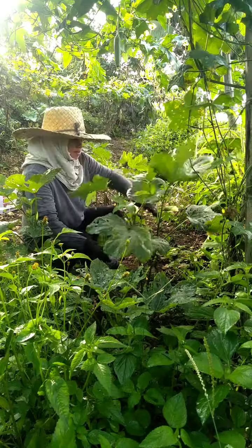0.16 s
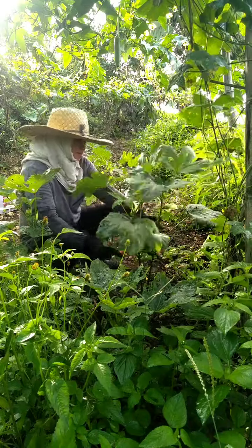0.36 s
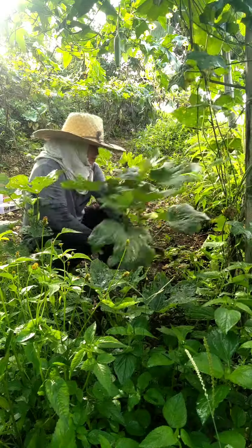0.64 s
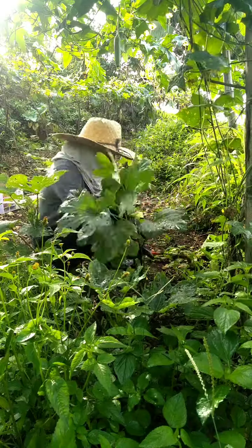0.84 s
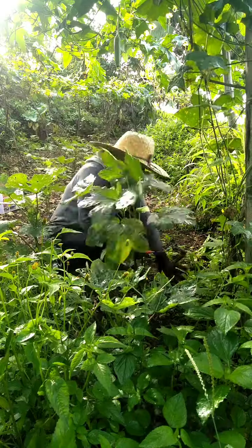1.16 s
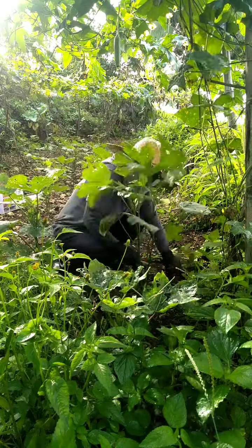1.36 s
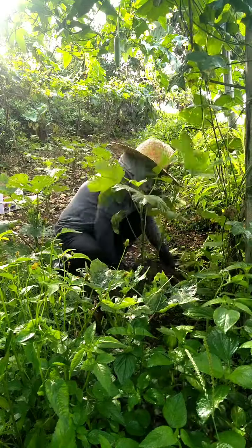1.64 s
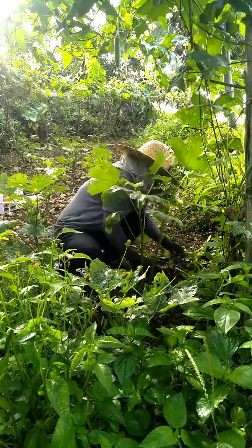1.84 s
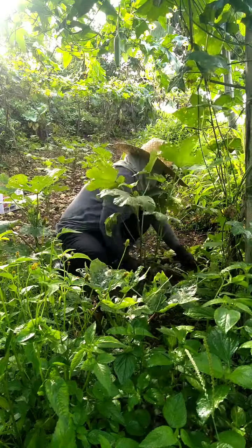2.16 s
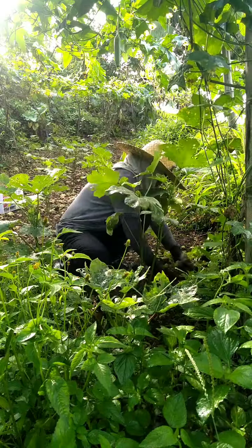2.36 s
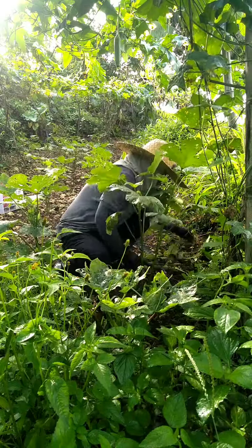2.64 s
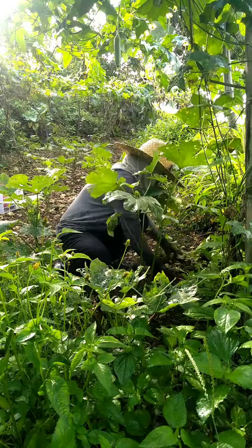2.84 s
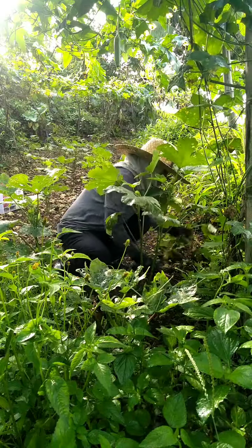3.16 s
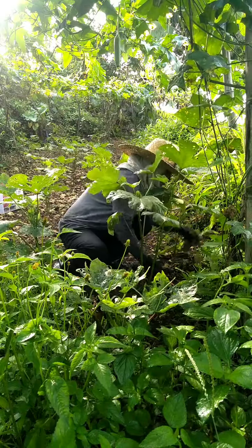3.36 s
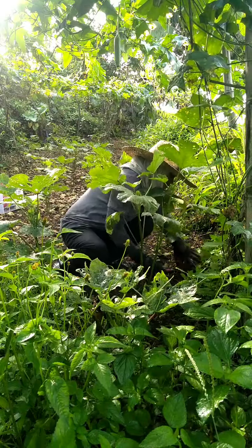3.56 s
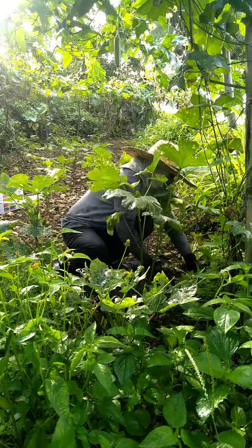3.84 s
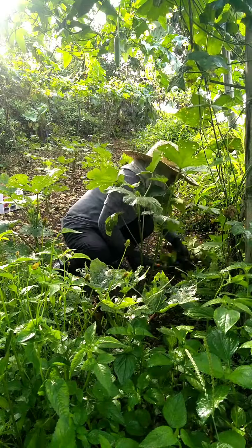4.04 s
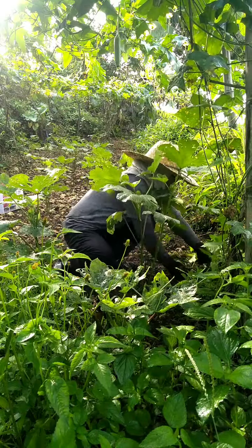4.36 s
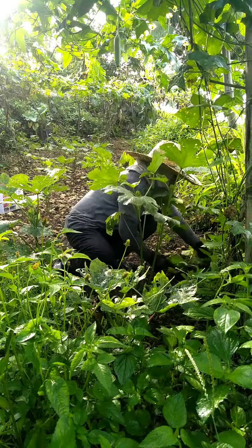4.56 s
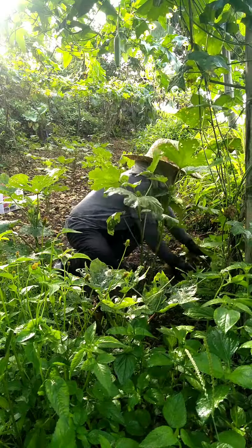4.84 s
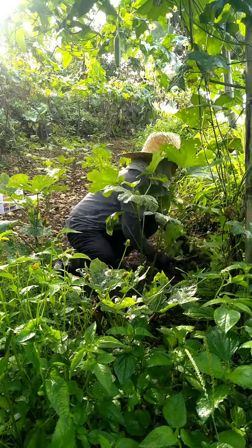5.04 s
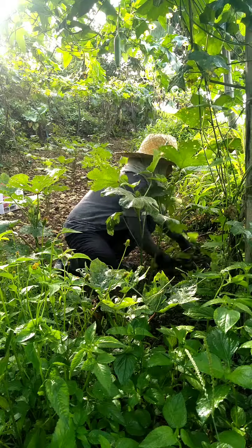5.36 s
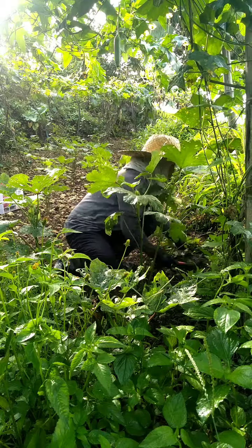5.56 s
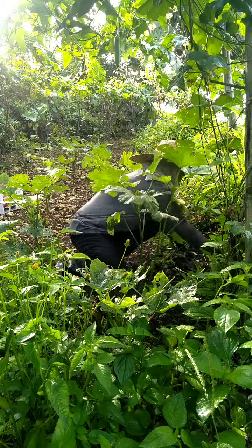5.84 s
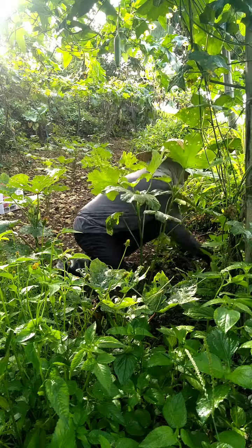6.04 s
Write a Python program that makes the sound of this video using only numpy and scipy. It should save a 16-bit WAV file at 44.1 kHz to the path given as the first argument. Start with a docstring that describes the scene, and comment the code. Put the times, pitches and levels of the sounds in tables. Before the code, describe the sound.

Hand weeding outdoors: leaf rustle, sharp stem cracks and blade scrapes in bursts, over steady high cricket trills and one close bird chip.

```python
"""Weeding by hand in a leafy garden: crickets sing and leaves rustle from the start, as calls come from the bushes.
Then stems snap and a small blade knocks and scrapes in gritty soil; amid this a close bird chips once.
The blade rests, returns in a short burst, the chirping crickets having softened just before, and strikes last near the end.
Shaped noise makes leaves, soil, cracks and bush calls; sine tones make the crickets, the chip and the ringing blade.
Decaying noise tails scatter every sound but the soil and the air."""
import sys
import numpy as np
from scipy import signal
from scipy.fft import rfft, irfft, next_fast_len
from scipy.io import wavfile
from scipy.ndimage import uniform_filter1d, map_coordinates

SR = 44100
rng = np.random.default_rng(int(sys.argv[2]) if len(sys.argv) > 2 else 0)


def file_out(sig):
    """Save sig as 16-bit WAV at sys.argv[1]."""
    # one column per channel
    cols = np.atleast_2d(sig).T
    # limit, then scale
    lim = np.clip(cols, -1, 1)
    pcm = np.round(lim * 32767).astype(np.int16)
    wavfile.write(sys.argv[1], SR, pcm)


N = 273420
TIME = np.arange(N) / SR  # seconds
TOP_HZ = 15720  # upper band limit

# Table levels are relative: each layer's function adds its own gain.
# spectrum of still outdoor air: pitch_hz [Hz], level_db [dB]
AIR_SPECTRUM = [(20, 1), (90, -9), (200, -12.5), (500, -16.5), (1500, -23.5), (3500, -22), (5000, -21.5),
                (8000, -21), (13000, -21.5), (15700, -24.5)]
# decay of the scattered echo in the foliage, scaled by each echo's life: pitch_hz [Hz], t60_s [s]
FOLIAGE_DECAY = [(200, 0.55), (1500, 0.24), (6000, 0.52), (14000, 0.14)]

# passages where the high cricket falters: start_s [s], end_s [s], level_db [dB]
TRILL_FALTERS = [(1.11, 1.2, -4), (1.58, 2.206, -3.5), (3.44, 4.19, -6.5)]
FALTER_SKIP_DB = -9.5  # further drop on every other pair of wing strokes
NEAR_CHIRP_S, EARLY_CHIRP_S, SLOWS_AT_S = .2146, .205, 1.4  # near period, its quicker opening period, when it slows
FAR_CHIRP_S, FAR_FIRST_S = .2035, .145  # far chirper's period and first chirp
CHIRP_HALF_S, CHIRP_SCATTER_DB = 0.034, 2.5  # half length to 1/e; spread of level
LULL_S, LULL_HALF_S, LULL_DB = 4.3, 0.22, -20  # both chirpers soften for a moment
CHIRP_RISE_HZ_PER_S = 450  # the pitch creeps up through each chirp

# bird calls from the bushes:
# centre_s [s], level_db [dB], pitch_hz [Hz], half_length_s [s, to 1/e], half_bandwidth_hz [Hz]
BUSH_CALLS_HEARD = [(.2, -55.5, 5600, 0.11, 253), (0.409, -74, 790, 0.03, 39.7),
                    (.881, -77, 1173, 0.017, 40.7), (0.957, -49, 5920, 0.029, 252),
                    (0.935, -71.5, 3470, 0.022, 402), (1.119, -75.5, 2650, 0.013, 200),
                    (1.358, -60, 1304, 0.014, 90), (1.506, -59, 1305, 0.017, 108),
                    (1.528, -70.5, 2520, 0.027, 700), (1.524, -55.5, 5760, 0.062, 174),
                    (1.638, -48, 5660, 0.03, 570), (1.752, -42, 5600, 0.015, 525),
                    (1.978, -67.5, 890, 0.0084, 92), (2.031, -66.5, 3200, 0.026, 160),
                    (2.815, -58.5, 1195, .022, 117), (3.338, -50, 6090, .073, 146),
                    (3.952, -66, 1630, 0.023, 156), (4.012, -71.5, 2110, 0.072, 143),
                    (4.089, -43, 5380, 0.015, 730), (4.663, -75, 2274, 0.36, 58),
                    (4.733, -73, 2840, .022, 100), (5.285, -73.5, 2610, 0.055, 89),
                    (5.471, -55, 5443, 0.052, 89.5), (5.964, -74, 3340, 0.061, 120)]
# pitch and level path of the close bird's chip: time_s [s], pitch_hz [Hz], level_db [dB]
CHIP_PATH = [(2.255, 2800, -51.5), (2.261, 4290, -37.5), (2.2645, 5860, -28.5), (2.268, 6870, -24.5),
             (2.2697, 6480, -30.5), (2.273, 5730, -17), (2.276, 5740, -23.5), (2.279, 4570, -42),
             (2.283, 2550, -46.5)]

# tugs at the roots and shifts of body weight: peak_s [s], level_db [dB], build_up_s [s]
ROOT_TUGS = [(1.97, -66, .025), (2.82, -46.5, 0.095), (3.73, -56.5, 0.013), (3.82, -65.5, 0.034),
             (4.013, -60, 0.03), (4.77, -61.5, 0.065), (5.53, -63, 0.017), (6.1, -69, 0.054)]
RELAX_SHARE, RUMBLE_DB = 1.2, -77  # the soil's release over its build-up; steady outdoor rumble before the heave gain
# clods and hands landing on the ground: start_s [s], level_db [dB], centre_hz [Hz]
GROUND_THUDS = [(0.239, -58, 1110), (0.562, -57, 314), (0.607, -66, 315), (0.949, -62.5, 343),
                (0.968, -57.5, 1180), (1.793, -61.5, 370), (1.794, -63, 830), (2.111, -60.5, 241),
                (2.171, -69, 324), (2.686, -57, 313), (4.913, -50, 368), (4.98, -68, 330),
                (5.788, -51.5, 250), (5.789, -54, 820), (6.067, -53, 417), (6.105, -61, 235),
                (6.154, -55.5, 402)]
# spectrum of the rumbling ground: pitch_hz [Hz], level_db [dB]
SOIL_SPECTRUM = [(15, -17), (29, 0), (42, -5.5), (62, 0), (85, 7.5), (103, 1), (130, 0), (170, -15),
                 (400, -34.5), (900, -53)]
# spectrum of a soft landing: pitch_ratio [times its centre pitch], level_db [dB]
CLOD_SPECTRUM = [(.3, -28), (.65, -4.5), (1, 5), (1.35, -2.5), (2.2, -17.5), (8, -49), (20, -57)]

# hand strokes through the plants:
# peak_s [s], rustle_db [dB], dry_treble_db [dB], build_up_s [s], lowest_leaf_resonance_hz [Hz]
HAND_STROKES = [(.11, -61.5, -66.5, 0.076, 2070), (.2, -57.5, -58, 0.083, 1870),
                (0.252, -50, -56, 0.056, 900), (.34, -57, -58, 0.053, 2100), (1.642, -53, -60, 0.042, 2100),
                (1.758, -44, -53.5, 0.019, 2120), (2.04, -78, -71, 0.039, 700),
                (2.148, -56, -55.5, 0.032, 1050), (2.31, -61, -63.5, 0.074, 1760),
                (2.46, -61, -60, 0.065, 850), (2.65, -61.5, -66.5, 0.12, 644), (2.81, -68, -89, 0.051, 645),
                (2.942, -53.5, -62, 0.043, 686), (3.09, -63.5, -60.5, 0.094, 890),
                (3.2, -61, -77, 0.075, 2460), (3.33, -66, -67, 0.058, 1960),
                (3.523, -58.5, -62.5, .015, 1080), (3.948, -66, -68, 0.083, 1390),
                (4.05, -64.5, -64, 0.047, 2060), (4.404, -62.5, -78, .025, 1310),
                (4.49, -53.5, -57, .05, 700), (4.72, -78, -89, 0.088, 1280),
                (4.922, -51.5, -59, 0.056, 1020), (4.988, -52, -58.5, 0.036, 590),
                (5.352, -59.5, -62.5, 0.012, 1230), (5.418, -55.5, -58.5, 0.041, 1290),
                (5.832, -62.5, -61, 0.032, 1190), (5.98, -68.5, -74, 0.063, 1250),
                (6.085, -50, -55, 0.026, 590), (6.159, -51.5, -47, 0.063, 537)]
SETTLE_S, SETTLE_SHARE = 0.028, 0.48  # leaves settle in this time plus a share of the build-up
# spectrum of rubbing leaves: pitch_hz [Hz], level_db [dB]
LEAF_SPECTRUM = [(120, -32), (250, -30), (500, -52), (720, 3.5), (1050, -2.5), (1550, 0.5), (2200, 4),
                 (3500, 3), (5000, -2), (7500, 1), (12000, -25.5)]
# spectrum of dry leaf edges: pitch_hz [Hz], level_db [dB]
CRISP_SPECTRUM = [(2500, -8.5), (4500, -21), (6000, 7.5), (7500, 2), (9000, -9), (10500, -2.5), (12000, -4),
                  (13500, -12), (14800, -46), (15700, -53)]

# blade contacts and stem snaps, the last three levels relative to the first:
# start_s [s], level_db [dB], blade_knock_db [dB], woody_body_db [dB], crumbling_grit_db [dB]
BLADE_AND_STEM_HITS = [(1.677, -32.5, -7.5, -14.5, -6), (1.691, -37, -7, -18, -1.5),
                       (1.832, -32, -32, -32, -11), (2.026, -57, 1.5, -28, -12), (2.114, -52.5, 2, -5, 1),
                       (2.138, -36, 1, -12, -5.5), (2.146, -37, -3.5, -43, 1),
                       (2.358, -24, -60, -18.5, -12.5), (2.445, -42.5, 0, -20, -7),
                       (2.502, -33.5, 0.5, -9.5, -4.5), (2.545, -48.5, -4.5, -4, -3.5),
                       (2.5767, -17, -17, -16, -6), (2.913, -49, 10.5, -7, -12),
                       (2.932, -40, 1.5, -12.5, -7), (2.985, -35, -3, -16, -1.5),
                       (3.046, -21.5, -10, -12.5, -7), (3.1549, -26.5, -47, -12, -15),
                       (3.301, -33, -17, -18.5, -2.5), (3.379, -60, 6.5, -21, -18),
                       (3.519, -49, -9, -2.5, -3.5), (4.891, -29.5, -17.5, -30, -11),
                       (4.912, -28, -13, -19.5, -1.5), (4.938, -36, -5, -15, -1),
                       (4.982, -28, -4, -18.5, -3.5), (6.03, -66, 16.5, -6.5, 6),
                       (6.069, -35, -5.5, -14.5, -13), (6.107, -41, -13, -17, -5)]
# ringing modes of the blade and its handle, before the scatter from blow to blow:
# pitch_hz [Hz], level_db [dB], t60_s [s]
BLADE_MODES = [(707, -5, 0.1), (773, -7, 0.015), (953.5, -6, 0.039), (1038, -3, 0.027), (1554, -9.5, 0.023),
               (3174, -13, 0.033), (4110, -9.5, 0.019), (4830, -31, 0.053), (6360, -6.5, 0.024)]
# spectrum of the sharp crack: pitch_hz [Hz], level_db [dB]
CRACK_SPECTRUM = [(800, -54), (2500, -8.5), (4500, 3.5), (6200, 3), (8000, -2.5), (10500, -11),
                  (12000, -6.5), (14000, -25), (15500, -89)]
# spectrum of the woody body: pitch_hz [Hz], level_db [dB]
WOODY_SPECTRUM = [(200, -58), (480, -14), (750, -26.5), (1200, -7.5), (2200, -3), (3300, 0.5), (4500, -3.5),
                  (7000, -31.5)]


def amp(db):
    """Decibels to gain."""
    return 10 ** (np.asarray(db) / 20)


def unit(x):
    """Scale to rms 1."""
    return x / np.sqrt(np.mean(x ** 2) + 1e-20)


def along(points, hz):
    """Read (Hz, value) points on a log pitch axis."""
    f, v = np.transpose(points)
    return np.interp(np.log(hz + 1), np.log(f + 1), v)


def curves(rows):
    """One value per sample for each column after the time."""
    s, *cols = np.transpose(rows)
    return [np.interp(TIME, s, c) for c in cols]


def wobble(rate):
    """A smooth random curve, rate knots a second."""
    return map_coordinates(rng.standard_normal(2048), [TIME * rate], mode="wrap")


def filtered(x, response):
    """x times a response of frequency."""
    m = next_fast_len(len(x) + 8192)
    return irfft(rfft(x, m) * response(np.fft.rfftfreq(m, 1 / SR)), m)[:len(x)]


def coloured(x, spectrum):
    """x given a (Hz, dB) spectrum, at rms 1."""
    return unit(filtered(x, lambda hz: amp(along(spectrum, hz))))


def noise(spectrum):
    """Coloured noise of rms 1, as long as the scene."""
    return coloured(rng.standard_normal(N), spectrum)


def causal(x, spectrum):
    """x given a spectrum by a minimum-phase filter: it rings only after each blow and white noise keeps its level."""
    m = next_fast_len(2 * len(x), real=True)
    gain = unit(amp(along(spectrum, np.fft.rfftfreq(m, 1 / SR))))
    cepstrum = irfft(np.log(gain), m)
    # folding the cepstrum onto positive time makes the filter causal
    fold = 1 + np.sign(m / 2 - np.arange(m)) * (np.arange(m) > 0)
    return irfft(rfft(x, m) * np.exp(rfft(cepstrum * fold)), m)[:len(x)]


def fade(t, t60):
    """Exponential decay, down 60 dB at t60."""
    return np.exp(-np.log(1000) * t / t60)


def swell(s, rise, fall):
    """An effort that builds smoothly up to time s and then dies away exponentially."""
    t = TIME - s
    building = (np.minimum(t, 0) / rise) ** 2
    dying = np.maximum(t, 0) / fall
    return np.exp(-np.minimum(building + dying, 20))


def add(track, s, sound):
    """Mix a sound into the track from time s."""
    start = max(round(s * SR), 0)
    track[start:start + len(sound)] += sound[:max(N - start, 0)]


def scattered(x, life):
    """Diffuse echo from leaves and ground: a noise tail whose decay depends on pitch; life scales its decay time."""
    hz, t, z = signal.stft(rng.standard_normal(SR // 2), SR, nperseg=256)
    t60 = life * along(FOLIAGE_DECAY, hz)[:, None]
    tail = signal.istft(z * fade(t, t60), SR, nperseg=256)[1]
    return signal.fftconvolve(x, tail / np.linalg.norm(tail))[:len(x)]


def crackle(rate, spread_db):
    """Tiny fractures at random moments, about rate a second, of widely varying size."""
    sizes = rng.standard_normal(N) * amp(spread_db * np.minimum(rng.exponential(size=N), 4))
    return unit(sizes * (rng.random(N) < rate / SR))


def still_air(level_db=-77):
    """Steady noise, weighted to the low end, lies under the whole garden."""
    return amp(level_db) * noise(AIR_SPECTRUM)


def wing_strokes(cycles, centre, width):
    """A smooth wing stroke once a cycle; centre and width are shares of the cycle."""
    u = ((cycles - centre + .5) % 1 - .5) / width
    return np.cos(np.pi * np.clip(u, -.5, .5)) ** 2


def wing_tone(hz, drift_hz, drift_rate):
    """The ring of a cricket's wing: a sine slightly unsteady in pitch."""
    return np.sqrt(2) * np.sin(2 * np.pi * np.cumsum(hz + drift_hz * wobble(drift_rate)) / SR)


def low_trill(level_db=-69):
    """A cricket trills lower and quicker than the closest one, without a break."""
    quick = .15 + wing_strokes(53 * TIME + .25 * wobble(14), 0, .9)
    tone = wing_tone(hz=6143, drift_hz=22.7, drift_rate=100)
    return amp(level_db) * unit(quick * amp(2.8 * wobble(25)) * tone)


def chirp_train(times, hz, drift_hz, drift_rate):
    """A run of like chirps, each swelling and rising a little in pitch, softer during the lull."""
    lull = LULL_DB * np.exp(-((times - LULL_S) / LULL_HALF_S) ** 2)
    db = CHIRP_SCATTER_DB * rng.standard_normal(len(times)) + lull
    nearest = np.searchsorted((times[1:] + times[:-1]) / 2, TIME)
    t = TIME - times[nearest]  # seconds from the middle of the nearest chirp
    buzz = .3 + wing_strokes(80 * TIME + .3 * wobble(12), 0, .9)
    tone = unit(buzz * wing_tone(hz + CHIRP_RISE_HZ_PER_S * t, drift_hz, drift_rate))
    return amp(db)[nearest] * np.exp(-(t / CHIRP_HALF_S) ** 2) * tone


def chirps(near_db=-64.5, far_db=-73, flutter_db=3):
    """Two crickets give short buzzing chirps, each at its own pace, drifting in and out of step."""
    beats = np.arange(-6, 24)
    near_times = SLOWS_AT_S + beats * np.where(beats < 0, EARLY_CHIRP_S, NEAR_CHIRP_S)
    far_times = np.arange(FAR_FIRST_S, N / SR, FAR_CHIRP_S)
    near = chirp_train(near_times, hz=5275, drift_hz=68, drift_rate=260)
    far = chirp_train(far_times, hz=5070, drift_hz=61, drift_rate=480)
    return amp(near_db + flutter_db * wobble(40)) * near + amp(far_db) * far


def high_trill(level_db=-61.0, wander_db=-0.5, stroke_db=1.67):
    """The closest cricket trills high in paired wing strokes and now and then falters."""
    pairs = 21.35 * TIME + .05 * wobble(5)
    paired = wing_strokes(pairs, .35, .46) + wing_strokes(pairs, .93, .42)
    skipped = np.floor(pairs + .35) % 2  # 1 on every other pair
    falter = np.zeros(N)
    for start, end, db in TRILL_FALTERS:
        falter += ((TIME > start) & (TIME < end)) * (db + FALTER_SKIP_DB * skipped)
    song = unit(paired * amp(stroke_db * wobble(30)) * wing_tone(hz=7088, drift_hz=28, drift_rate=130))
    return amp(level_db + wander_db * wobble(4) + uniform_filter1d(falter, size=256)) * song


def crickets(echo_db=-10, close_echo_db=-18):
    """The insects sing from within the foliage, which scatters them; the closest one is almost dry."""
    close, hidden = high_trill(), low_trill() + chirps()
    return close + hidden + scattered(amp(close_echo_db) * close + amp(echo_db) * hidden, life=0.5)


def bush_birds(level_db=-1, overtone_db=-4, throat_hz=3000, echo_db=-6):
    """Many paths through the leaves smear each call into a narrow band of noise that swells and fades."""
    out, t = np.zeros(N), np.arange(SR // 2) / SR
    from_centre = t - t.mean()
    for s, db, hz, length, width in BUSH_CALLS_HEARD:
        line = lambda f: 1 / np.sqrt(1 + ((f - hz) / width) ** 6)
        # only the low calls keep their octave: the bird's throat damps higher overtones
        octave = amp(overtone_db) / (1 + (2 * hz / throat_hz) ** 6)
        band = unit(filtered(rng.standard_normal(len(t)), lambda f: line(f) + octave * line(f / 2)))
        add(out, s - t.mean(), amp(db + level_db) * band * np.exp(-(from_centre / length) ** 2))
    return out + amp(echo_db) * scattered(out, life=0.82)


def close_bird(chip_db=0, overtone_db=-36, rasp=0.48, near_db=-9, far_db=-22):
    """One raspy chip sweeps up and down in a quick arch, with a short echo from leaves and a long one from the garden."""
    hz, db = curves(CHIP_PATH)
    phase = 2 * np.pi * np.cumsum(hz) / SR
    tone = np.sin(phase) + amp(overtone_db) * np.sin(2 * phase)
    voice = tone * (1 + rasp * wobble(1800))
    sounding = (TIME > CHIP_PATH[0][0]) * (TIME < CHIP_PATH[-1][0])
    chip = amp(db + chip_db) * sounding * voice
    return chip + amp(near_db) * scattered(chip, life=0.24) + amp(far_db) * scattered(chip, life=0.95)


def soil(heave_db=-2, thud_db=0, thud_t60=0.14):
    """The ground rumbles as roots give way, and thuds in fading noise when clods land."""
    power = np.full(N, amp(RUMBLE_DB) ** 2)
    for s, db, rise in ROOT_TUGS:
        power += (amp(db) * swell(s, rise, RELAX_SHARE * rise)) ** 2
    out = amp(heave_db) * np.sqrt(power) * noise(SOIL_SPECTRUM)
    t = np.arange(SR // 4) / SR
    for s, db, hz in GROUND_THUDS:
        spectrum = [(hz * ratio, level) for ratio, level in CLOD_SPECTRUM]
        puff = causal(rng.standard_normal(len(t)) * fade(t, thud_t60), spectrum)
        add(out, s, amp(db + thud_db) * puff)
    return out


def patchy(x, depth_db, band_size, time_size):
    """The rustle's colour varies in random patches of pitch and time."""
    z = signal.stft(x, nperseg=512)[2]
    across_pitch = uniform_filter1d(rng.standard_normal(z.shape), band_size, 0)
    field = uniform_filter1d(across_pitch, time_size, 1)
    return unit(signal.istft(z * amp(depth_db * unit(field)), nperseg=512)[1][:len(x)])


def leaf_ticks(count, cycles, centre_hz=2200, octaves=0.95, spread_db=3):
    """Single leaf edges flick past each other, each ringing a few cycles at its own pitch."""
    t = np.arange(SR // 100) / SR
    when, size = rng.random((count, 2)).T
    hz = np.clip(centre_hz * 2 ** (octaves * rng.standard_normal((count, 1))), 800, 9000)
    level = amp(-spread_db * np.log(np.maximum(size, .03)))[:, None]
    ticks = level * np.sin(2 * np.pi * hz * t) * fade(t, 2 * cycles / hz)
    index = (when * N).astype(int)[:, None] + np.arange(len(t))
    return unit(np.bincount(index.ravel(), ticks.ravel(), N)[:N])


def leaf_size(x, hz, bloom=0.75, q=4, upper=2.01, upper_bloom=0.57):
    """Leaves radiate little below their lowest resonance and bloom in two bands above it."""
    hz = np.clip(hz, 200, 6000)
    x = signal.sosfilt(signal.butter(3, hz, "high", fs=SR, output="sos"), x)
    band = lambda ratio: signal.lfilter(*signal.iirpeak(ratio * hz, q, fs=SR), x)
    return x + bloom * band(1.16) + upper_bloom * band(upper)


def rustle(body_db=-2.0, crisp_db=-2, flutter_db=1.8, stir_db=-88):
    """With each stroke leaves rub, crackle and tick; dry edges add crisp treble. Between strokes they barely stir."""
    grains = (crackle(rate=2000, spread_db=3) + rng.standard_normal(N)) * amp(flutter_db * wobble(70))
    rubbing = patchy(coloured(grains, LEAF_SPECTRUM), depth_db=4.5, band_size=3, time_size=11)
    body = .87 * rubbing + .6 * leaf_ticks(count=2400, cycles=12)
    edges = patchy(coloured(grains, CRISP_SPECTRUM), depth_db=2.5, band_size=4, time_size=9)
    leaves, dry_power = amp(stir_db) * body, np.zeros(N)
    for s, db, dry_db, rise, hz in HAND_STROKES:
        effort = swell(s, rise, SETTLE_S + SETTLE_SHARE * rise)
        shifted = np.roll(body, rng.integers(N))  # other grains for each stroke
        leaves += amp(db + body_db) * effort * leaf_size(shifted, hz)
        dry_power += (amp(dry_db) * effort) ** 2
    return leaves + amp(crisp_db) * np.sqrt(dry_power) * edges


def blade_ring(t, detune=0.019, blur_hz=12, attack=0.0042):
    """Soil presses on the blade, so its modes shift from blow to blow and waver as they die."""
    hz, db, t60 = np.transpose(BLADE_MODES)[:, :, None]
    pitch, strength = rng.standard_normal((2, len(BLADE_MODES), 1))
    steps = rng.standard_normal((len(BLADE_MODES), len(t)))
    waver = np.cumsum(steps, axis=1) * np.sqrt(2 * np.pi * blur_hz / SR)  # random walk of phase
    tones = np.sin(2 * np.pi * hz * (1 + detune * pitch) * t + waver)
    modes = amp(db + 2 * strength) * fade(t, t60) * tones
    return modes.sum(axis=0) * (1 - np.exp(-t / attack))


def snaps(crack_db=-8, wood_db=6, ring_db=0.5, crack_t60=0.0073, crumble_t60=0.073, grit=0.58):
    """Each contact is a sharp crack with a woody body, a short crumbling of grit and the ring of the blade."""
    out, t = np.zeros(N), np.arange(SR // 4) / SR
    for s, db, knock_db, body_db, crumble_db in BLADE_AND_STEM_HITS:
        fractures = crackle(rate=2600, spread_db=7.0)[:len(t)]
        grains = unit(fractures * grit + rng.standard_normal(len(t)))
        crumbling = amp(crumble_db) * fade(t, crumble_t60) * grains
        burst = fade(t, crack_t60) * rng.standard_normal(len(t)) + crumbling
        crack = amp(crack_db) * causal(burst, CRACK_SPECTRUM)
        wood = amp(body_db + wood_db) * causal(burst, WOODY_SPECTRUM)
        add(out, s, amp(db) * (crack + wood + amp(knock_db + ring_db) * blade_ring(t)))
    return out


def scene(echo_db=-16):
    """The work and its echo among insects, birds and still air."""
    garden = still_air() + crickets() + bush_birds() + close_bird()
    work = rustle() + snaps()
    work_echo = amp(echo_db) * scattered(work, life=0.81)
    return (garden + soil() + work + work_echo)[None]


def record(dry):
    """Nothing is kept above the band limit."""
    return filtered(dry[0], lambda hz: hz < TOP_HZ)[None]


dry = scene()
out = record(dry)
file_out(out)
```